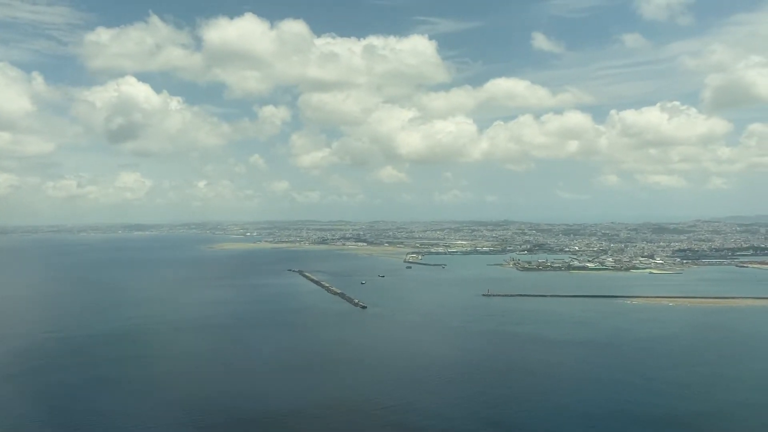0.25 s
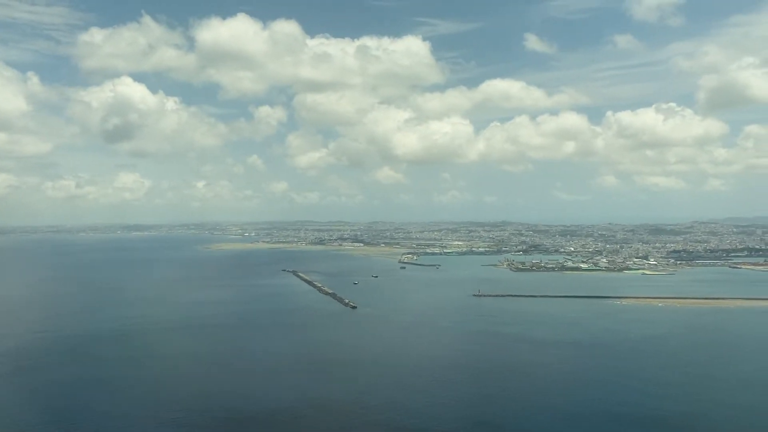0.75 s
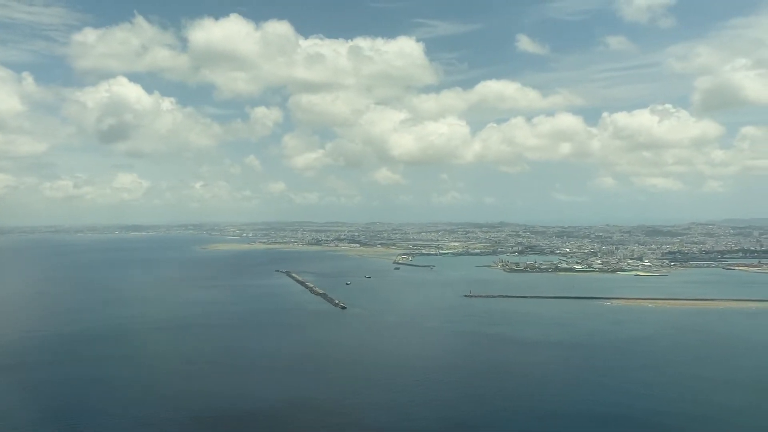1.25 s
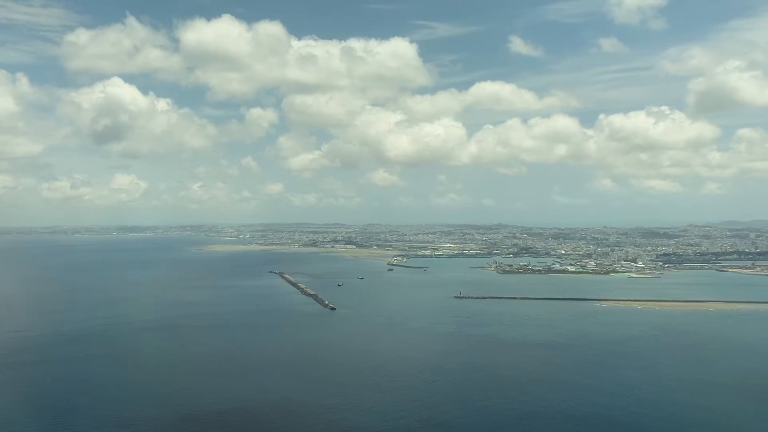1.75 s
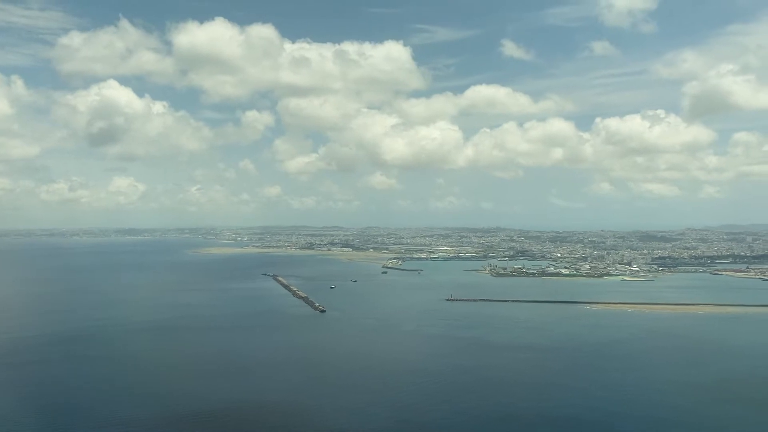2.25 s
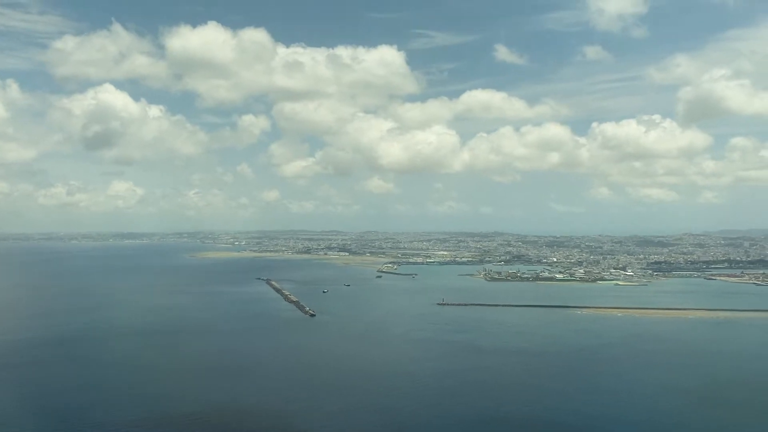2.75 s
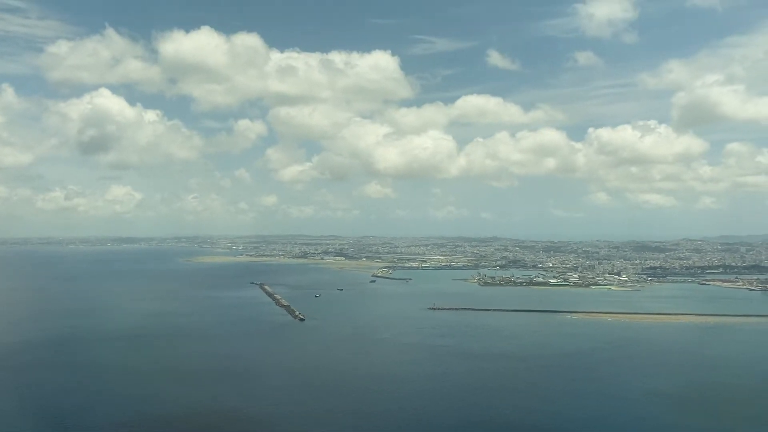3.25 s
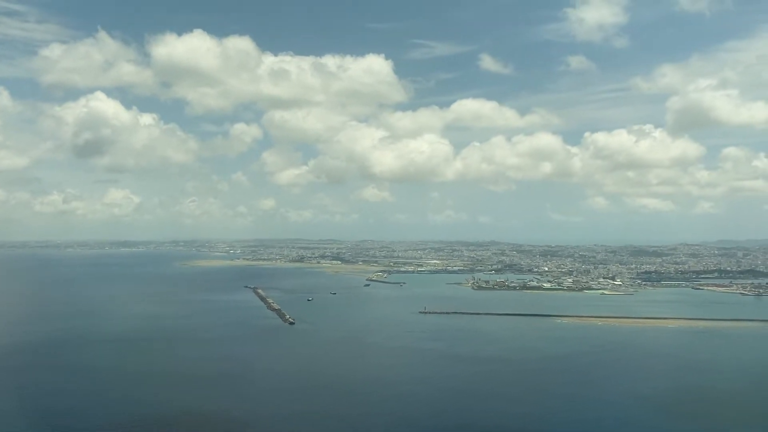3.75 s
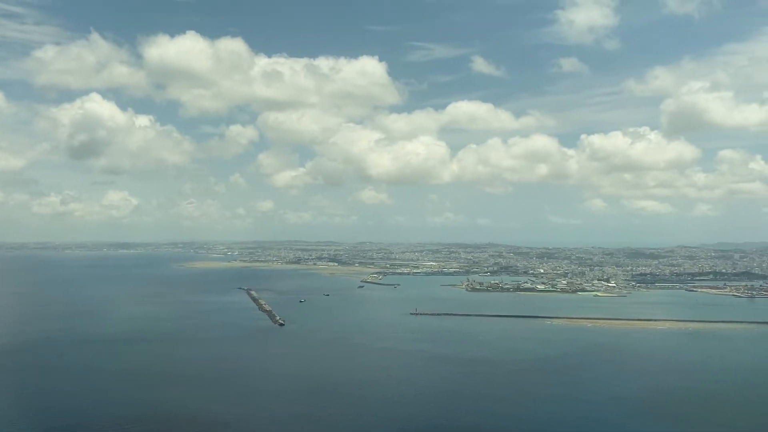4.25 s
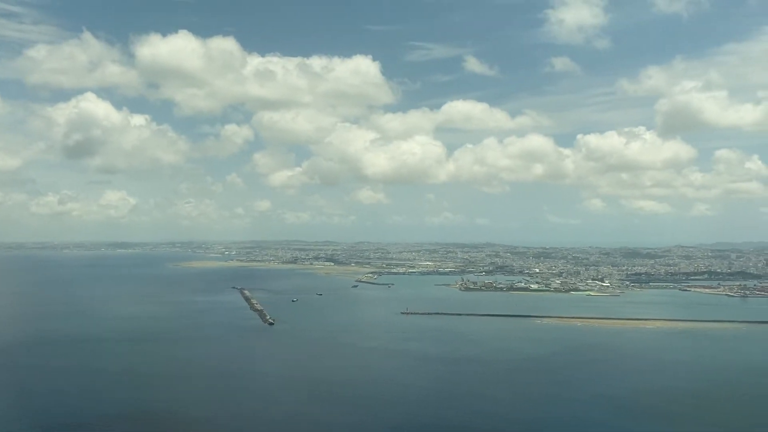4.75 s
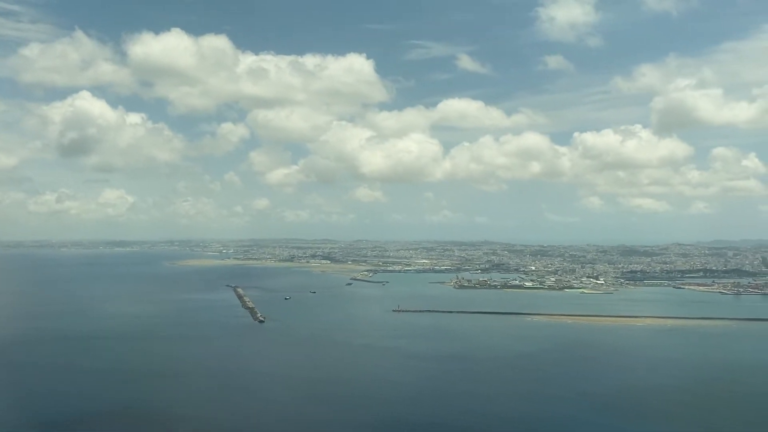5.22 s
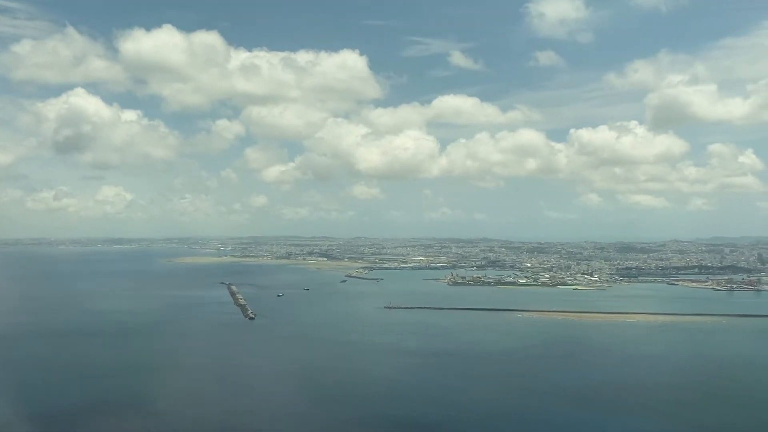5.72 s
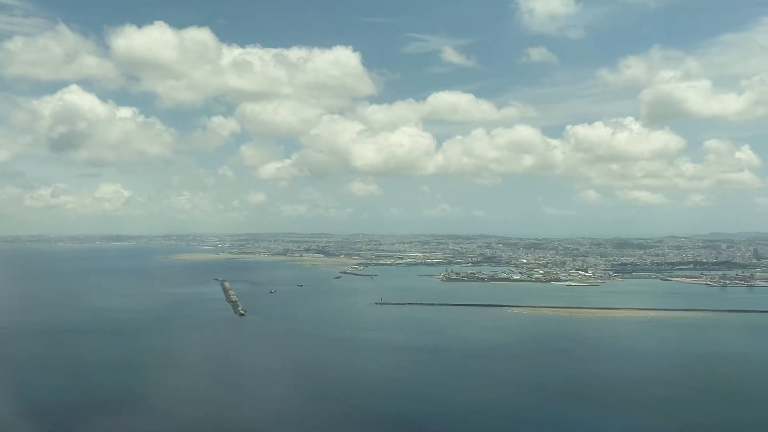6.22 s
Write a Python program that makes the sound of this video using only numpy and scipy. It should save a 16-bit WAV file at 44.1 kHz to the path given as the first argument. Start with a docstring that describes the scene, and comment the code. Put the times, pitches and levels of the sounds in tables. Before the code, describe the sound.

Deep fuselage rumble and soft air rush at a plane's window seat, a faint engine whine dipping for two seconds before slowly rising.

```python
"""A window seat inside a descending airliner, heard in stereo for six and a half seconds.
From the start, shaped noise gives the rumble through the fuselage, the rush along the skin, the hiss of
the vents and a faint duct whistle; sines give fan hums, a thin electrical squeal of uneven level and
two engine whines. The main whine sinks for about two seconds as the engine coasts.
Then the engine spools up and its whine climbs to the end."""
import sys
import numpy as np
from scipy import signal
from scipy.fft import rfft, irfft, next_fast_len
from scipy.io import wavfile
from scipy.ndimage import uniform_filter1d, map_coordinates

SR = 44100
rng = np.random.default_rng(int(sys.argv[2]) if len(sys.argv) > 2 else 0)


def dump_mix(stems):
    """Bounce the given channels to the path in sys.argv[1] as a 16-bit WAV at rate SR."""
    frames = np.atleast_2d(stems).T  # one column per channel
    limited = np.clip(frames, -1, 1)  # hard clip at full scale
    pcm = np.round(limited * 32767).astype(np.int16)
    wavfile.write(sys.argv[1], SR, pcm)


N = 285768  # samples

# Relative spectra of fuselage rumble, rush along the skin and vent hiss: frequency_hz, density_db (per Hz)
RUMBLE_SPECTRUM = [(12, -37), (27, -17), (43, -5.5), (60, -1), (80, 1), (98, -4), (122, 1), (150, -2),
                   (190, -5.5), (213, -11), (232, -10), (258, -8.5), (300, -12.5), (340, -14), (410, -19.5),
                   (600, -63)]
RUSH_SPECTRUM = [(280, -17.5), (400, 0), (475, 2), (535, 2.5), (570, -2), (700, 0.5), (750, -4), (830, -2),
                 (940, -6.5), (1200, -7.5), (1360, -6.5), (1700, -6), (2000, -8.5), (2400, -10),
                 (2800, -19), (4000, -28)]
HISS_SPECTRUM = [(2000, -40), (2800, 3), (3600, 0.5), (4600, -0.5), (5150, -2), (5450, -7.5), (6300, -7),
                 (7300, -11), (8500, -24), (9600, -21), (11100, -19.5), (11700, -33), (12500, -55),
                 (15000, -48)]
# Cabin panels and cavities that colour the rush: centre_hz, width_hz, gain_db
PANEL_RESONANCES = [(518, 21, -9.5), (615, 51, -6.5), (1010, 24, -1.5), (1234, 44, -3), (1603, 78, -6.5),
                    (1780, 60, -9), (2005, 45, -8), (2099, 35, -8), (2234, 61, -5.5), (2443, 57, -1),
                    (2648, 55, 3)]
# Vent resonances that colour the hiss: centre_hz, width_hz, gain_db
VENT_RESONANCES = [(2910, 60, -10), (3110, 41, -9), (3290, 45, -5), (3920, 60, -12), (4300, 60, -6),
                   (4630, 22, -8)]
# Airflow: steady levels (dB; rush and hiss at mean engine speed) and depth of the swells (dB)
RUMBLE_DB, RUSH_DB, HISS_DB = -18.5, -31, -44
RUMBLE_SWELL_DB, RUSH_EDDY_DB, HISS_EDDY_DB = 0.3, 1, 0.64
# The rumble starts a little low and settles: shortfall (dB), time constant (s)
RUMBLE_LOW_DB, RUMBLE_SETTLE_S = 1, 1
# Growth of rush and hiss with engine speed (dB per octave of the whine)
RUSH_DB_PER_OCT, HISS_DB_PER_OCT = 3.5, 3

# Likeness of the two sides at the seat: frequency_hz, likeness (0-1)
SIDE_LIKENESS = [(50, 0.96), (130, 0.99), (220, 0.99), (310, 0.83), (470, 0.01), (650, 0.16), (830, 0.46),
                 (1050, 0.27), (1400, 0.4), (1700, 0.42), (2400, 0.53), (3300, 0.74), (4500, 0.25),
                 (7000, 0.28)]
# Phase lead of the left side: frequency_hz, lead_rad
LEFT_LEAD = [(30, 0.3), (65, 0.35), (130, -0.4), (230, -0.73), (350, -0.04), (560, 1), (690, 1), (780, 3.5),
             (950, 3.5), (1150, 1), (1400, 2), (1600, -0.6), (1950, -0.38), (2900, 1.5), (4400, 1.26),
             (5800, 0.27)]
# Level of left minus right: frequency_hz, difference_db
LEFT_TILT = [(55, -0.5), (160, 0.7), (240, -1), (460, 3), (530, 1), (610, -0.5), (720, 0.5), (1500, 2),
             (2400, 2.4), (3400, 2), (4900, 7), (6200, 6.5), (7600, 0), (11000, -1)]

# Duct whistle: pitch, width and drift (Hz), level and depth of its flares (dB)
WHISTLE_HZ, WHISTLE_WIDTH_HZ, WHISTLE_DRIFT_HZ = 1787, 43, 11.04
WHISTLE_DB, WHISTLE_FLARE_DB = -49.5, 2.6

# Engine speed as whine pitch: coasting down from a start (Hz) by a sag (Hz), with a time constant (s)
START_HZ, SAG_HZ, SAG_S = 626.5, 63.6, 1.59
# S-curve added as it spools up: rise (Hz), moment of the S-curve's steepest climb (s), time constant (s)
CLIMB_HZ, CLIMB_AT_S, CLIMB_S = 255, 4.87, 0.84
WHINE_WAVER_HZ = 0.8
# Whine before the cabin colours it: time_s, level_db
WHINE_LEVEL = [(0, 2.5), (0.25, 1.5), (0.45, -2), (0.85, 2), (1.25, -5.5), (2.1, -5.5), (2.8, -1),
               (3.45, -3), (3.85, .5), (4.22, 1), (4.4, -6), (4.65, 0), (5.1, -.5), (5.8, -6), (6.48, -6)]
# Cabin standing waves swept by the whine: centre_hz, width_hz, seat_level_db, left_right_db, left_lead_rad
STANDING_WAVES = [(622, 36, -41.8, 10, .2), (646, 20, -45.5, 0, 0), (682, 22, -47, -3, 1.8),
                  (714, 36, -42.5, 6, 2)]

# Fans and electrics: pitch_hz, level_db, left_right_db, left_lead_rad, waver_hz, flutter_db
EQUIPMENT_TONES = [(798, -49.8, .5, -2.4, .5, 1.5), (1101, -53, 2.7, .7, 1.5, 1.2),
                   (1122.5, -60, 2, 1, .4, 1), (1903, -48.6, 4, -1, .25, .5), (2320, -63, 4, 0, .5, 1.5),
                   (3271, -63.5, 2, .5, 2, 1.5), (3882, -62, -1, 1.5, .5, 1.2),
                   (4321, -61.5, 4.6, 1.4, .5, 1.2), (5118, -67.5, 8, .3, .5, 1.2),
                   (10002, -81, 0, .2, .5, 1.2)]
# Strongest hum: pitch and beat rate (Hz), a moment when its two fans are in step (s), second fan relative (dB)
HUM_HZ, BEAT_HZ, IN_STEP_S, SECOND_FAN_DB = 721.8, 1.15, 0.28, -4
# First fan of the strongest hum: time_s, level_db
HUM_LEVEL = [(0, -46.5), (1.2, -45.5), (2, -51.5), (2.9, -49), (3.8, -47.5), (4.6, -46.5), (5.5, -48.5),
             (6.48, -53)]

SQUEAL_HZ = 11197.6
# Electrical squeal: time_s, level_db
SQUEAL_LEVEL = [(0, -60.5), (2.17, -59.5), (2.4, -64.5), (3, -63.5), (3.6, -67.5), (4.1, -65), (4.78, -65),
                (4.86, -71), (5.15, -70), (5.4, -67), (6.48, -65)]

# Fainter, higher whine from the engine's lighter second shaft: time_s, pitch_hz
CORE_PITCH = [(0, 1130), (0.9, 1120), (1.6, 1117), (2.3, 1121), (3, 1132), (4.05, 1155), (5.25, 1190),
              (6.48, 1226)]
# The same whine: time_s, level_db
CORE_LEVEL = [(0, -52), (1.3, -53), (2, -56), (2.9, -55), (3.4, -62), (4.5, -55.5), (5.3, -56), (6.48, -59)]

TOP_HZ = 15140  # upper band limit of the microphone chain


def amp(db):
    """Decibels to gain."""
    return 10 ** (np.asarray(db) / 20)


def unit(x):
    """Scale to rms 1."""
    return x / np.sqrt(np.mean(x ** 2) + 1e-20)


def along(points, hz):
    """Read (Hz, value) points on a log frequency axis."""
    f, v = np.transpose(points)
    return np.interp(np.log(hz + 1), np.log(f + 1), v)


def curve(points):
    """(s, value) points as one value per sample."""
    return np.interp(np.arange(N) / SR, *np.transpose(points))


def wobble(rate):
    """A smooth random curve with rate knots a second."""
    knots = rng.standard_normal(int(N * rate / SR) + 4)
    return map_coordinates(knots, [np.arange(N) * rate / SR])


def filtered(x, response):
    """x shaped by a complex response of frequency."""
    m = next_fast_len(N + SR // 2)
    hz = np.fft.rfftfreq(m, 1 / SR)
    return irfft(rfft(x, m) * response(hz), m)[..., :N]


def sides(value):
    """Half of a difference to the left, minus half to the right."""
    return np.array([np.atleast_1d(value), -np.atleast_1d(value)]) / 2


def cabin_noise(spectrum):
    """Turbulent noise of rms 1: nearly alike on both sides in the bass, more diffuse higher up."""
    def spread(hz):
        turn = np.arccos(np.clip(along(SIDE_LIKENESS, hz), -1, 1)) / 2
        return np.array([np.cos(turn), np.sin(turn)])

    def colour_and_place(hz):
        colour = amp(along(spectrum, hz)) * (hz < spectrum[-1][0])
        place = amp(sides(along(LEFT_TILT, hz))) * np.exp(1j * sides(along(LEFT_LEAD, hz)))
        return colour * place

    mid, side = filtered(rng.standard_normal((2, N)), spread)
    return unit(filtered(np.array([mid + side, mid - side]), colour_and_place))


def ringing(x, resonances):
    """x with narrow resonances added to the direct sound."""
    def response(f):
        return 1 + sum(amp(db) / (1 + (2 * (f - hz) / width) ** 2) for hz, width, db in resonances)

    return filtered(x, response)


def patchy(x, depth_db):
    """Eddies: patches a few hundred Hz wide and about a tenth of a second long swell and fade alone."""
    z = signal.stft(x, nperseg=512)[2]
    field = uniform_filter1d(rng.standard_normal(z.shape[1:]), size=4, axis=0)  # across frequency
    field = uniform_filter1d(field, size=16, axis=1)  # across time
    eddied = signal.istft(z * amp(depth_db * unit(field)), nperseg=512)[1]
    return unit(eddied[:, :N])


def tone(hz, pan_db, lead, flutter_db):
    """A stereo sine of rms 1 that flutters on its way through the cabin."""
    phase = 2 * np.pi * np.cumsum(hz) / SR
    flutter = wobble(6) + np.array([wobble(9.8), wobble(23)])  # shared part, then left and right
    return unit(np.sin(phase + sides(lead)) * amp(sides(pan_db) + flutter_db * flutter))


def shaft_hz():
    """The engine coasts towards idle, then spools up along an S-curve."""
    t = np.arange(N) / SR
    coast = START_HZ - SAG_HZ * (1 - np.exp(-t / SAG_S))
    climb = CLIMB_HZ / (1 + np.exp((CLIMB_AT_S - t) / CLIMB_S))
    return coast + climb


def airflow():
    """Fuselage rumble settles; panel-coloured rush and vent-coloured hiss follow engine speed."""
    octaves = np.log2(shaft_hz() / shaft_hz().mean())
    shortfall_db = RUMBLE_LOW_DB * np.exp(-np.arange(N) / SR / RUMBLE_SETTLE_S)
    rumble_db = RUMBLE_DB - shortfall_db + RUMBLE_SWELL_DB * wobble(5)
    rumble = amp(rumble_db) * cabin_noise(RUMBLE_SPECTRUM)
    rush = patchy(ringing(cabin_noise(RUSH_SPECTRUM), PANEL_RESONANCES), RUSH_EDDY_DB)
    rush = amp(RUSH_DB + RUSH_DB_PER_OCT * octaves) * rush
    hiss = patchy(ringing(cabin_noise(HISS_SPECTRUM), VENT_RESONANCES), HISS_EDDY_DB)
    hiss = amp(HISS_DB + HISS_DB_PER_OCT * octaves) * hiss
    return rumble + rush + hiss


def whistle():
    """Air whistles faintly in a duct: a narrow noise band flares at random and drifts in pitch."""
    band = filtered(rng.standard_normal((2, N)), lambda hz: 1 / (1 + (2 * hz / WHISTLE_WIDTH_HZ) ** 2))
    pitch = WHISTLE_HZ + WHISTLE_DRIFT_HZ * wobble(4)
    phase = 2 * np.pi * np.cumsum(pitch) / SR + sides(along(LEFT_LEAD, WHISTLE_HZ))
    flare = amp(WHISTLE_FLARE_DB * wobble(7) + sides(along(LEFT_TILT, WHISTLE_HZ)))
    carried = band[0] * np.cos(phase) + band[1] * np.sin(phase)  # noise moved up to the pitch
    return amp(WHISTLE_DB) * unit(flare * carried)


def engine():
    """A shaft tone follows engine speed, swelling and shifting sides as it glides through standing waves."""
    pitch = shaft_hz() + WHINE_WAVER_HZ * wobble(15)
    hz, width, db, pan_db, lead = np.transpose(STANDING_WAVES)
    power = amp(db) ** 2 / (1 + (2 * (pitch[:, None] - hz) / width) ** 2)
    total = power.sum(axis=1)
    # the standing waves excited most decide the side and the phase
    pan = power @ pan_db / total
    whine = tone(pitch, 0, power @ lead / total, flutter_db=0.5)
    return amp(curve(WHINE_LEVEL)) * np.sqrt(total) * amp(sides(pan)) * whine


def equipment():
    """Fans and electrics hum near steady pitches; two fans of nearly equal speed beat slowly."""
    steady = 0
    for hz, db, pan_db, lead, waver_hz, flutter_db in EQUIPMENT_TONES:
        steady = steady + amp(db) * tone(hz + waver_hz * wobble(12), pan_db, lead, flutter_db)
    beat_phase = 2 * np.pi * BEAT_HZ * (np.arange(N) / SR - IN_STEP_S)
    beat = np.abs(1 + amp(SECOND_FAN_DB) * np.exp(1j * beat_phase))
    hum = tone(HUM_HZ + 0.27 * wobble(12), pan_db=-3.5, lead=-1.67, flutter_db=0)
    return steady + amp(curve(HUM_LEVEL)) * beat * hum


def squeal():
    """A thin high sine, alike on both sides, flutters and follows a level curve."""
    level_db = curve(SQUEAL_LEVEL) + 1.4 * wobble(23.96)
    sine = np.sin(2 * np.pi * SQUEAL_HZ * np.arange(N) / SR)
    return amp(level_db) * np.sqrt(2) * sine


def core():
    """The second shaft's tone sinks too, and picks up speed a little before the main one."""
    return amp(curve(CORE_LEVEL)) * tone(curve(CORE_PITCH), pan_db=4, lead=0.92, flutter_db=1.5)


def scene():
    """Everything heard from the window seat."""
    return airflow() + whistle() + engine() + equipment() + squeal() + core()


def record(dry):
    """The microphone chain keeps nothing above its band limit."""
    return filtered(dry, lambda hz: hz < TOP_HZ)


dry = scene()
out = record(dry)
dump_mix(out)
```